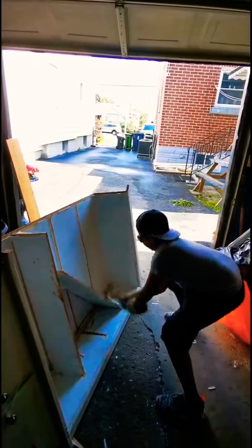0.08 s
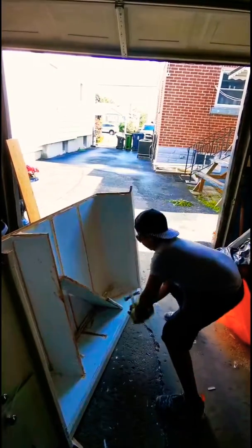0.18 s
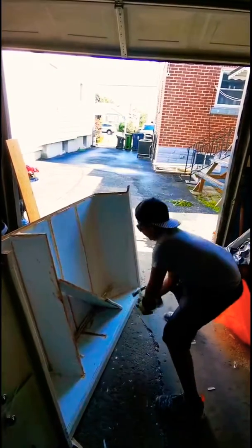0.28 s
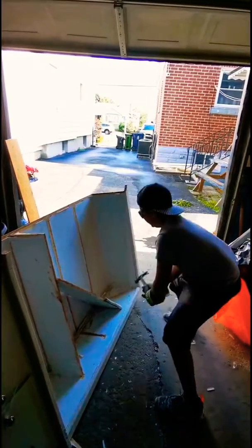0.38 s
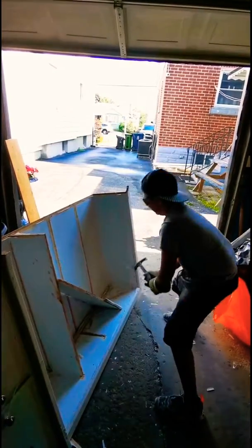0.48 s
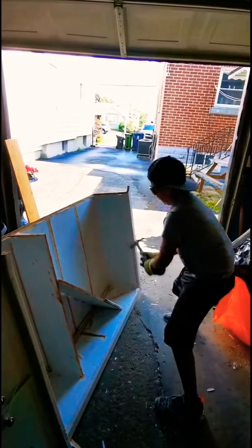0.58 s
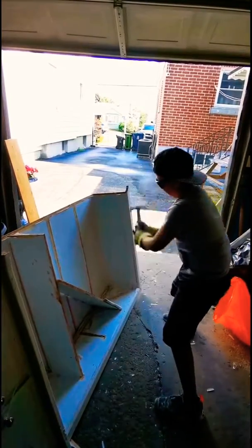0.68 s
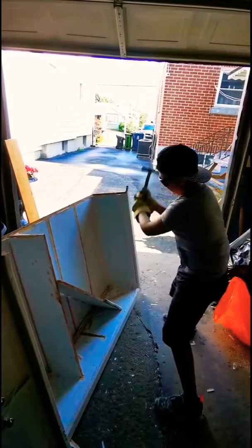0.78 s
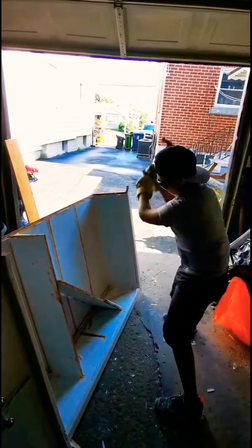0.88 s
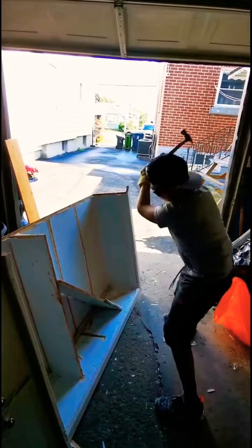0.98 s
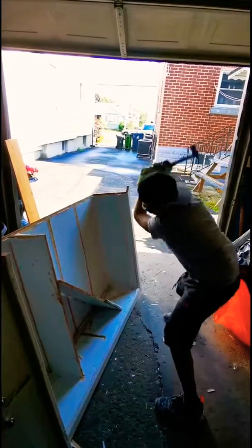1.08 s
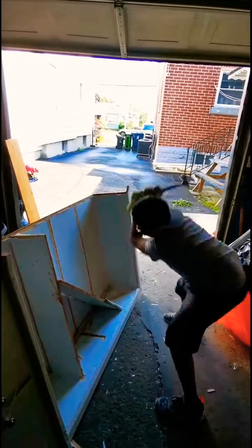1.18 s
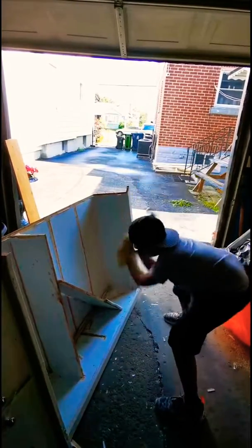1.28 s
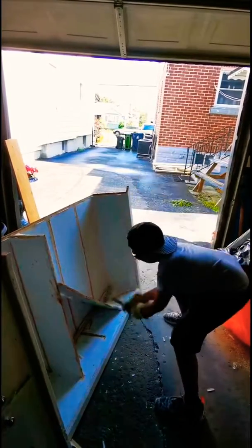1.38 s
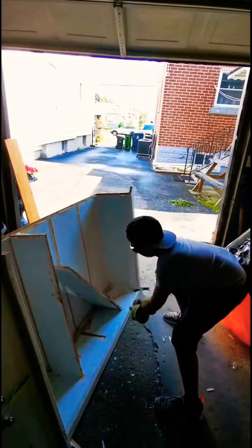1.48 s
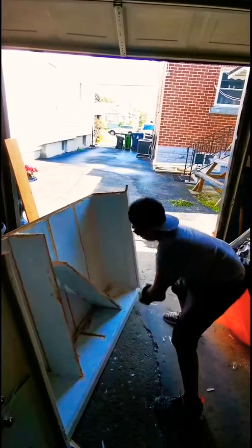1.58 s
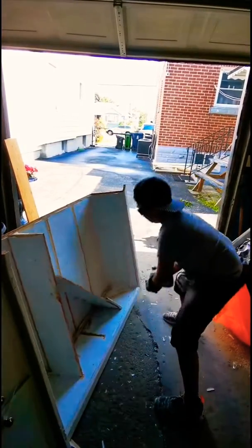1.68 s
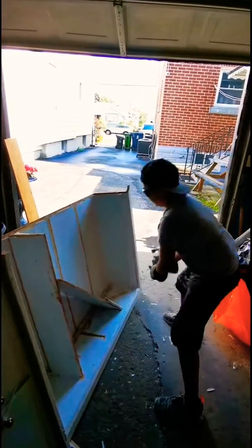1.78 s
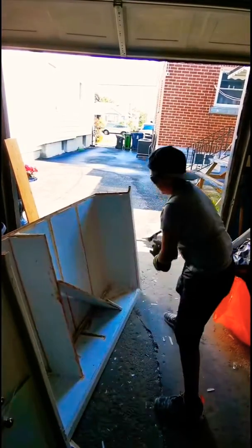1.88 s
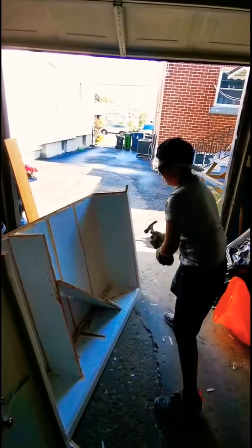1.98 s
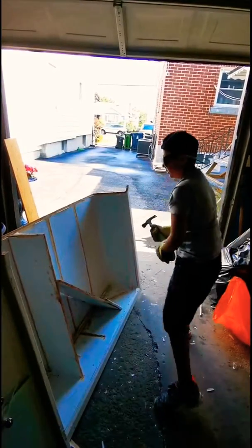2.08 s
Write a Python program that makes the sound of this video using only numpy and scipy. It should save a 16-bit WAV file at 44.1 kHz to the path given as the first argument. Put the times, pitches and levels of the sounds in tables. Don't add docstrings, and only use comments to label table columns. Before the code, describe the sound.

Hammer blows break a wooden cabinet in a concrete garage, close and right of centre, over faint low hum and outdoor air. A loud cracking hit at 0.2 s, a duller rebound at 0.4, a gritty shoe scuff near 0.6, a very faint metallic squeak around 1.1. A second heavy blow at 1.5, then a shelf knocks down at 1.8 and a loose board rattles until 2.1 with another scuff.

```python
import sys
import numpy as np
from scipy import signal
from scipy.fft import rfft, irfft
from scipy.io import wavfile
from scipy.ndimage import uniform_filter1d

SR = 44100
rng = np.random.default_rng(int(sys.argv[2]) if len(sys.argv) > 2 else 0)


def to_wav(sig):
    pcm = np.clip(np.atleast_2d(sig), -1, 1) * 32767
    pcm = np.round(pcm).astype(np.int16)
    wavfile.write(sys.argv[1], SR, pcm.T)


def makeup_ratio(level_db):
    decades = np.asarray(level_db, float) / 20
    return 10 ** decades


N = 92610
T = np.arange(N) / SR
FREQS = np.maximum(np.arange(N // 2 + 1) * SR / N, 1)


def curve(points, hz):
    points = np.array(points)
    return np.interp(np.log(hz), np.log(points[:, 0]), points[:, 1])


def level(x, db):
    return x * makeup_ratio(db) / np.sqrt(np.mean(x ** 2))


def colour(x, points):
    cepstrum = irfft(curve(points, FREQS) * np.log(10) / 20, N)
    cepstrum[1:N // 2] *= 2
    cepstrum[N // 2 + 1:] = 0
    return irfft(rfft(x) * np.exp(rfft(cepstrum)), N)


def stereo_noise(alike_hz):
    mid, side = rfft(rng.standard_normal((2, N)))
    share = FREQS / (FREQS + alike_hz)
    return np.array([mid + share * side, mid - share * side]) / np.sqrt(1 + share ** 2)


def ring(modes, longest_s, scatter_db=3.0):
    hz, db, t60 = np.array(modes).T[:, :, None]
    t = T[:int(min(1.5 * longest_s, 0.5) * SR)]
    scatter = scatter_db * rng.standard_normal((2, len(modes)))
    sign = np.where(hz.T > 600, (-1.0) ** np.arange(len(modes)), 1)
    gain = sign * makeup_ratio(db.T + scatter)
    decay = 1000.0 ** (-t / np.minimum(t60, longest_s))
    return gain @ (np.sin(2 * np.pi * hz * t) * decay)


def outdoor_air():
    # pitch_hz, level_db (per Hz)
    air_spectrum = [(20, -13.5), (55, -11.5), (90, -16), (300, -24), (550, -29.5), (850, -29), (2400, -33),
                    (3200, -45), (16000, -55)]
    return level(irfft(stereo_noise(920) * makeup_ratio(curve(air_spectrum, FREQS)), N), -57)


def hum():
    # pitch_hz, width_hz, level_db
    hum_bands = [(52.7, 8, 1.5), (118, 12, -8.5), (159.8, 16, -12), (237.2, 14, -14), (301.6, 14.3, -9),
                 (820, 150, -20.5)]
    bands = sum(makeup_ratio(db) / (1 + ((FREQS - hz) / (width / 2)) ** 2) for hz, width, db in hum_bands)
    return level(irfft(stereo_noise(900) * bands, N), -55)


def garage(x):
    # pitch_hz, t60_s
    reverb_times = [(60, 1), (250, 0.6), (1000, 0.42), (2500, 0.4), (6000, 0.44), (15000, 0.27)]
    wet_db, alike_hz, rise_s = -8.5, 201.1, 0.003
    noise, tail = stereo_noise(alike_hz), 0
    for hz in 45 * 2 ** np.arange(0, 9, 0.5):
        band = np.cos(np.clip(np.log2(FREQS / hz) * 2, -1, 1) * np.pi / 2) ** 2
        tail = tail + irfft(noise * band, N) * 1000.0 ** (-T / curve(reverb_times, hz))
    tail = tail * (1 - np.exp(-T / rise_s))
    tail = tail / np.sqrt(np.sum(tail ** 2) / 2)
    return x + makeup_ratio(wet_db) * signal.fftconvolve(x, tail, axes=1)[:, :N]


def right_of_centre(x):
    # pitch_hz, level_db
    side_difference = [(60, -6.5), (125, -2), (250, -0.5), (500, -5.5), (1000, -3.5), (2200, -10),
                       (4400, -1), (8000, -4), (13000, -12.5)]
    lag_s = 0.00017
    tilt = makeup_ratio(curve(side_difference, FREQS) / 2)
    sides = np.array([tilt * np.exp(-2j * np.pi * FREQS * lag_s), 1 / tilt])
    return irfft(rfft(x) * sides, N)


def scuffs():
    # peak_s, rise_s, fall_s, level_db
    strokes = [
        (.06, 0.079, 0.13, -64),
        (.55, 0.015, .015, -54.5),
        (.585, 0.0124, 0.017, -49.5),
        (0.61, 0.068, 0.053, -47.5),
        (1.17, 0.12, 0.037, -72),
        (1.42, 0.14, 0.12, -63.5),
        (2.031, 0.053, 0.15, -51),
    ]
    # pitch_hz, level_db (per Hz)
    scuff_spectrum = [(710, -46), (1200, 3), (1380, -9), (2130, -2), (5240, 0.5), (6370, -5), (11100, -3),
                      (13700, -9), (16000, -17)]
    flutter_db = 2.2 * uniform_filter1d(rng.standard_normal(N), 150) * 10
    grit = rng.standard_normal((2, N)) * makeup_ratio(flutter_db)
    shape = 0
    for peak_s, rise, fall, db in strokes:
        shape = shape + makeup_ratio(db) * np.exp(-((T - peak_s) / np.where(T < peak_s, rise, fall)) ** 2)
    return level(colour(grit, scuff_spectrum), 0) * shape


def ticks():
    # start_s, level_db, fade_s
    touches = [
        (.2, -24, .002),
        (.933, -57, 0.0011),
        (1.058, -51, 0.0009),
        (1.494, -40, 0.004),
        (1.739, -47, 0.033),
        (1.819, -21.5, 0.002),
        (1.971, -29, 0.0043),
        (2.047, -54, 0.0017),
        (2.077, -29, 0.0078),
    ]
    # pitch_hz, level_db (per Hz)
    tick_spectrum = [(2000, -28), (5000, 0.5), (9000, -5.5), (11500, -0.5), (14000, -8.5), (16000, -16.5)]
    out = np.zeros((2, N))
    for s, db, fade_s in touches:
        t = T - s
        noise = colour(rng.standard_normal((2, N)), tick_spectrum)
        out += makeup_ratio(db) * noise * (t > 0) * np.exp(-np.abs(t) / fade_s)
    return out


def loose_head():
    # start_s, length_s, lower_mode_db, upper_mode_db
    slips = [
        (1.078, 0.03, -57, -73),
        (1.105, 0.018, -63.5, -75.5),
        (1.121, .017, -61.5, -75),
        (1.136, .015, -65, -72),
        (1.149, 0.014, -60.5, -68.5),
        (1.166, .032, -70, -80),
        (1.213, 0.02, -76.5, -79),
        (1.224, .024, -69, -84),
    ]
    head_hz = (3735, 6670)
    edge_s, start_flat, settle_s = 0.007, 0.044, 0.0052
    waver = 1 + 0.0082 * 20 * uniform_filter1d(rng.standard_normal(N), size=400)
    waver = waver - start_flat * np.exp(-np.abs(T - slips[0][0]) / settle_s)
    modes = np.sin(2 * np.pi * np.cumsum(np.outer(head_hz, waver), axis=1) / SR)
    gates = [np.clip(np.minimum(T - s, s + length - T) / edge_s, 0, 1) for s, length, *_ in slips]
    strengths = makeup_ratio(np.array(slips)[:, 2:].T) @ np.array(gates)
    return np.sum(strengths * modes, axis=0)


def steel_face():
    # start_s, level_db
    face_contacts = [
        (0.2, -29),
        (0.2042, -25),
        (1.4951, -20.5),
        (1.508, -24),
    ]
    # pitch_hz, level_db, t60_s
    face_modes = [(4460, 4.5, 0.0095), (6600, -1, 0.0064), (9060, -3.5, 0.023), (10775, -2, 0.02),
                  (13060, -4.5, .012)]
    out = np.zeros((2, N))
    for s, db in face_contacts:
        face, at = ring(face_modes, 0.05), int(s * SR)
        out[:, at:at + face.shape[1]] += makeup_ratio(db) * face
    return out


def carcass_booms():
    # start_s, level_db, pitch_hz, t60_s
    pushes = [(0.199, -23, 46.04, .06), (.21, -53, 111, 0.15), (0.439, -30, 84.8, 0.13),
              (1.492, -32, 45.5, .06), (1.521, -36.5, 126.8, 0.34), (1.87, -26, 89, 0.105),
              (2.0, -34, 89, 0.28), (.207, -12.5, 425, .09), (.229, -17.5, 425, 0.16),
              (.399, -27.5, 345, .12), (.402, -29, 421, 0.11), (1.503, -11, 440.5, 0.077),
              (1.504, -12.5, 368.5, .08), (1.822, -25, 503, 0.089), (1.94, -22, 271, .1),
              (1.94, -23, 437.6, .1), (1.941, -28, 193, .1)]
    out = np.zeros(N)
    for s, db, hz, t60 in pushes:
        t = np.maximum(T - s, 0)
        swell = 1 - np.exp(-20 * t / t60)
        out += makeup_ratio(db) * np.sin(2 * np.pi * hz * t) * 1000.0 ** (-t / t60) * swell
    return out


def edge_modes(edge, count=20):
    low_hz, high_hz = edge[0][0], edge[-1][0]
    hz = low_hz + (high_hz - low_hz) * (np.arange(count) + rng.random(count)) / count
    t60_s = 0.014
    return np.array([hz, curve(edge, hz), t60_s + 0 * hz]).T


def boards():
    # pitch_hz, level_db, t60_s
    side_body = [(194, -15, 0.11), (231, -2, 0.062), (285, -12, 0.033), (354, 5.5, 0.046),
                 (422.7, 5.5, 0.079), (430, -10, 0.045), (613, -11, 0.035), (679, -4, 0.067),
                 (826, -5.5, 0.04), (931, -4.5, 0.08)]
    rebound_body = [(129.5, -14, 0.03), (191, -0.5, 0.3), (238, 1, .1), (287, -1, 0.086), (359, 2, 0.16),
                    (425, 1.5, 0.24), (470, -11, 0.11), (727, 3, 0.055)]
    back_body = [(181, -21.5, 0.033), (269, -7, .1), (326, -11, 0.081), (372, -1, 0.24), (444, -4.5, 0.068),
                 (550, -17, 0.017), (671.4, -6.5, 0.19), (804, -5, 0.048), (896, -11, 0.14)]
    shelf_body = [(201, -17.5, 0.28), (259, 3.5, 0.038), (366, -9.5, 0.098), (455, 1.5, 0.11),
                  (481, -3, 0.094), (591, -22.5, 0.1), (726, -2, 0.055), (822, -4, 0.039), (923, -4, 0.023)]
    loose_body = [(187, -5, 0.27), (278.3, 4.5, 0.2), (345, 4, 5.0), (455, -1, 0.34), (539, -50, 0.25),
                  (760, -14, 0.18), (860, -45, 5.0)]
    # pitch_hz, level_db
    side_edge = [(950, 4), (1260, 2), (1700, -2), (2060, 8.5), (2450, 5), (2900, -17)]
    back_edge = [(950, -9), (1300, -6), (1600, -6), (2000, 8), (2400, 6.5), (3000, -8.5)]
    shelf_edge = [(950, 3.5), (1300, 6), (1650, -5), (1860, 6.5), (2400, 7), (3000, -23)]
    pairs = [(side_body, side_edge), (rebound_body, side_edge), (back_body, back_edge),
             (shelf_body, shelf_edge), (loose_body, shelf_edge)]
    return [(body, edge_modes(edge)) for body, edge in pairs]


def knock(start_s, body_db, edge_db, crack_db, rattle_s, body, edge):
    t = T[:SR // 4]
    chance = rng.random((2, len(t)))
    fade = np.exp(-t / min(rattle_s, 0.03))
    taps = (chance[0] < 0.02) * (2 * chance[1] - 1) * fade * 0.63
    taps[0] = 1
    out, at = np.zeros((2, 2, 2 * N)), int(start_s * SR)
    for db, modes in ((body_db, body), (edge_db, edge)):
        sound = signal.fftconvolve(taps[None], ring(modes, 0.075), axes=1)
        out[0, :, at:at + sound.shape[1]] += makeup_ratio(db) * sound / np.abs(sound).max()
    noise = rng.standard_normal((2, len(t))) * 0.34
    out[1, :, at:at + len(t)] = makeup_ratio(crack_db) * (noise + 1.1 * taps) * fade
    return out[:, :, :N]


def cabinet():
    # start_s, body_db, edge_db, crack_db, rattle_s
    contacts = [(0.1989, -22.5, -16, -16.5, 0.0036), (0.2002, -14, -2.5, -4.5, 0.0059),
                (.202, 0, -8, -9.5, 0.014), (.2055, -9.5, -13.5, -6.5, 0.0075),
                (.213, -12.5, -27, -21, .01), (.219, -26, -6, -4.5, .016), (.233, -20, -26, -13.5, 0.01),
                (0.396, -22.5, -28, -23, 0.021), (0.43, -21.5, -61, -32, .034),
                (1.4919, -23.5, -16, -13.5, .004), (1.4943, -2, -0.5, -3.5, .006),
                (1.4985, -6, -2, -8, 0.011), (1.508, -13, -5.5, -4, .012),
                (1.519, -18.5, -11, -14.5, 0.014), (1.534, -31, -19, -18.5, .01),
                (1.551, -18, -25, -23, .006), (1.699, -41, -56, -47, 0.019), (1.812, -34, -46, -35, .004),
                (1.817, -18.5, -21, -21, 0.01), (1.822, -17.5, -17.5, -23, 0.015),
                (1.835, -15, -26, -24.5, 0.014), (1.848, -15, -33, -30.5, .015),
                (1.864, -24, -47, -35, 0.01), (1.932, -25, -62, -62, 0.0072),
                (1.943, -26, -65, -62, 0.0083), (1.958, -21, -65, -62, 0.0048),
                (1.974, -43, -43, -34.5, .008), (2.0, -28.5, -74, -59, .01), (2.023, -34.5, -74, -54, .006),
                (2.034, -36, -73, -56, 0.013), (2.059, -29, -71, -57, .006),
                (2.079, -52, -28.5, -29, 0.015)]
    # pitch_hz, level_db (per Hz)
    crack_spectrum = [(60, -36.5), (150, -25.5), (400, -12.5), (700, -3), (2300, -7), (3300, -13),
                      (10900, -24), (16000, -38.5)]
    struck = boards()
    board_changes_s = [0.3, 1, 1.8, 1.9]
    wood, crack = sum(knock(*row, *struck[np.searchsorted(board_changes_s, row[0])]) for row in contacts)
    high_pass = signal.butter(2, 110, "high", fs=SR, output="sos")
    return signal.sosfilt(high_pass, wood) + makeup_ratio(15.5) * colour(crack, crack_spectrum) + carcass_booms()


def scene():
    contacts = cabinet() + scuffs() + ticks() + steel_face()
    return right_of_centre(garage(contacts)) + outdoor_air() + hum() + loose_head()


def roll_off(x):
    return signal.sosfilt(signal.butter(12, 16270, fs=SR, output="sos"), x)


def record(dry):
    low_pass = signal.butter(12, 15250, fs=SR, output="sos")
    x = signal.sosfilt(low_pass, dry)
    mix = np.clip(np.tanh(0.89 * x) / 0.77, -1, 1)
    return roll_off(mix)


dry = scene()
out = record(dry)
to_wav(out)
```